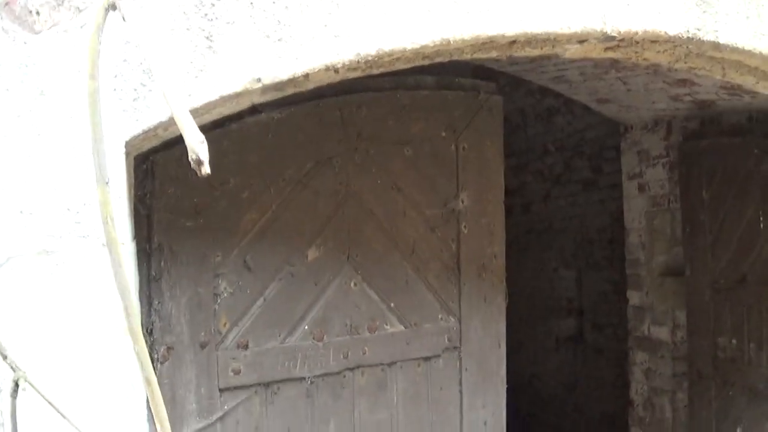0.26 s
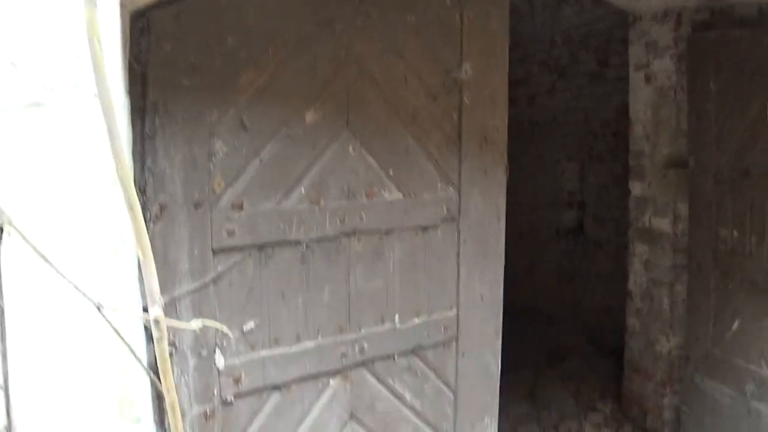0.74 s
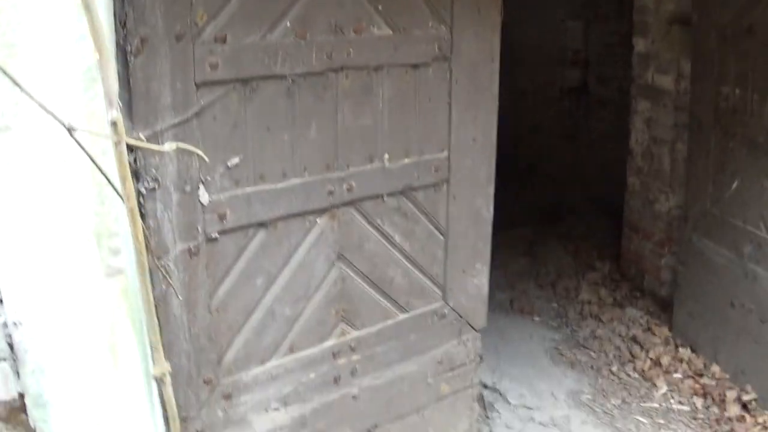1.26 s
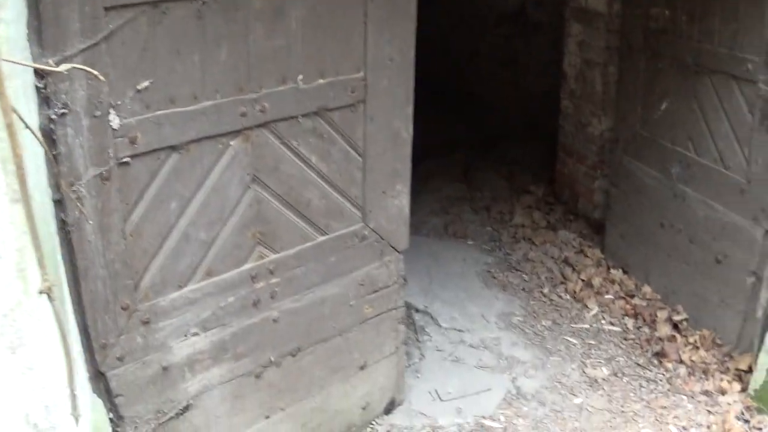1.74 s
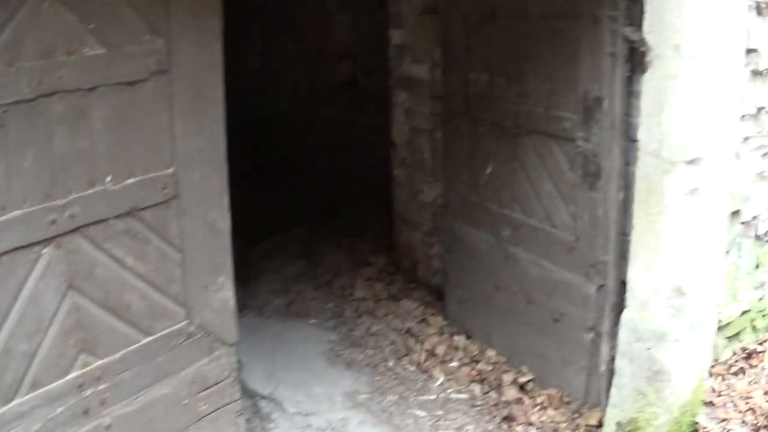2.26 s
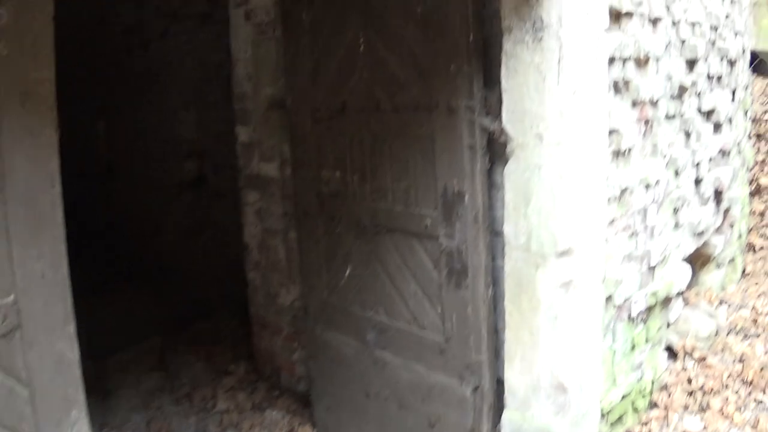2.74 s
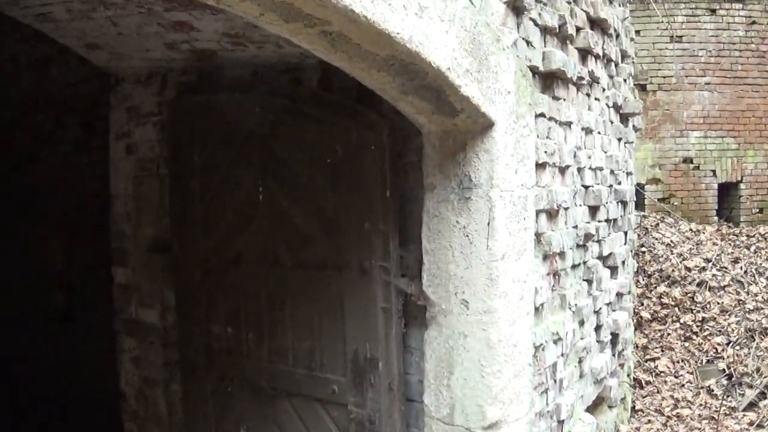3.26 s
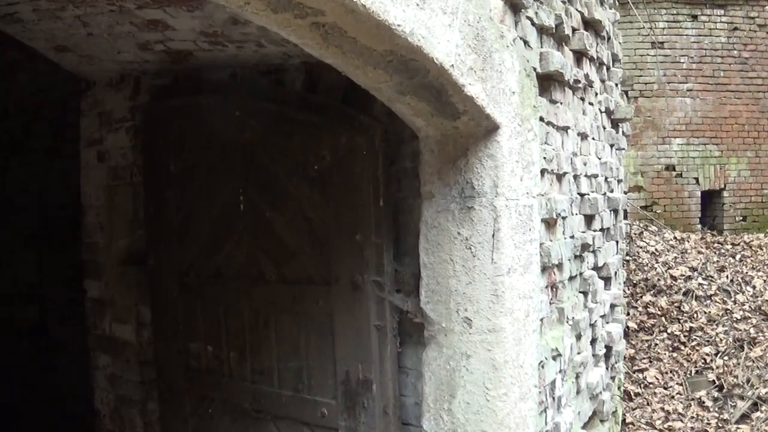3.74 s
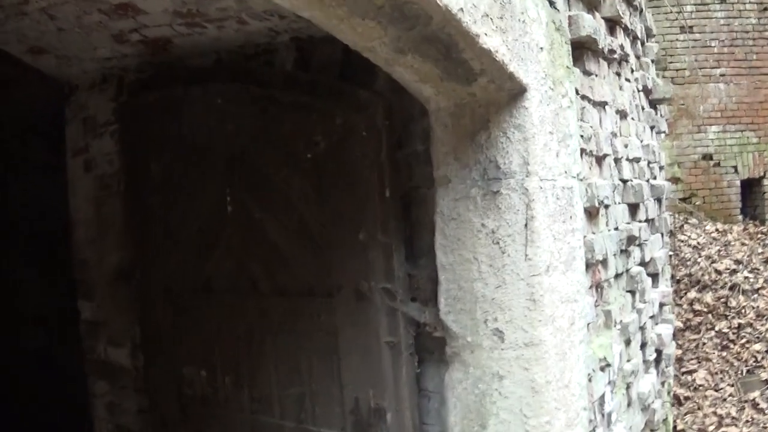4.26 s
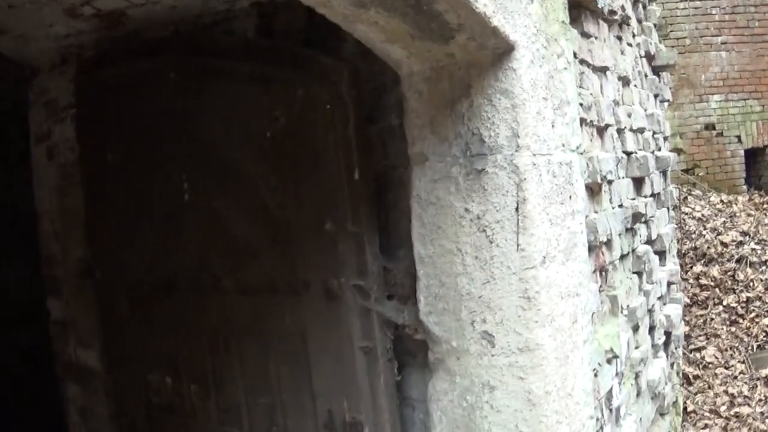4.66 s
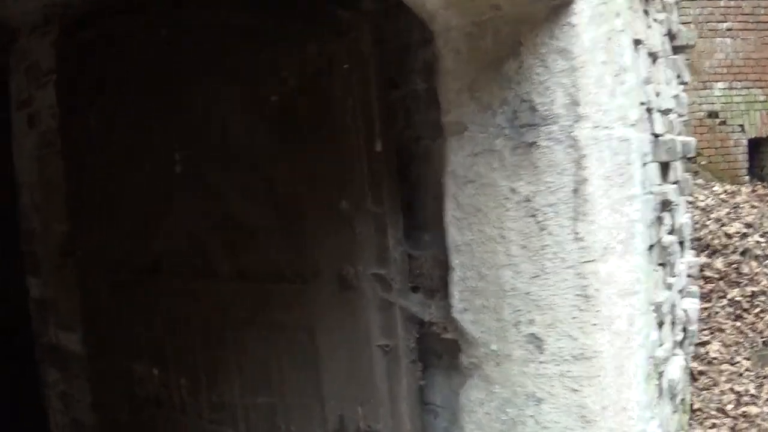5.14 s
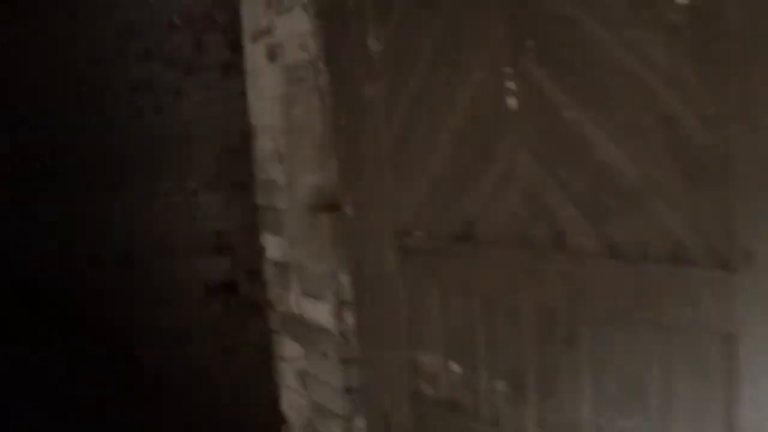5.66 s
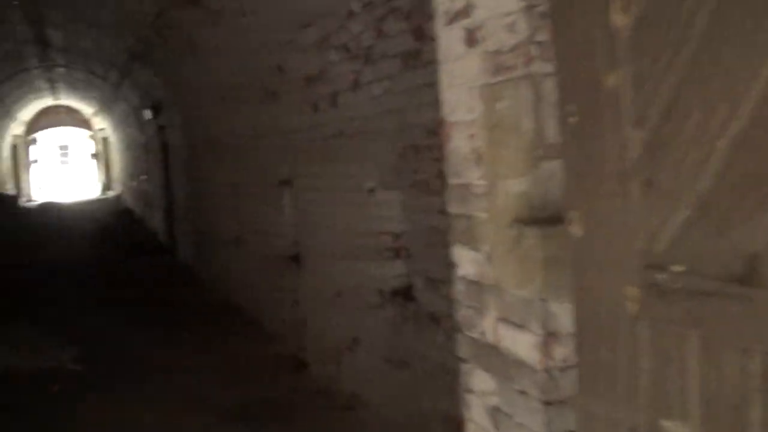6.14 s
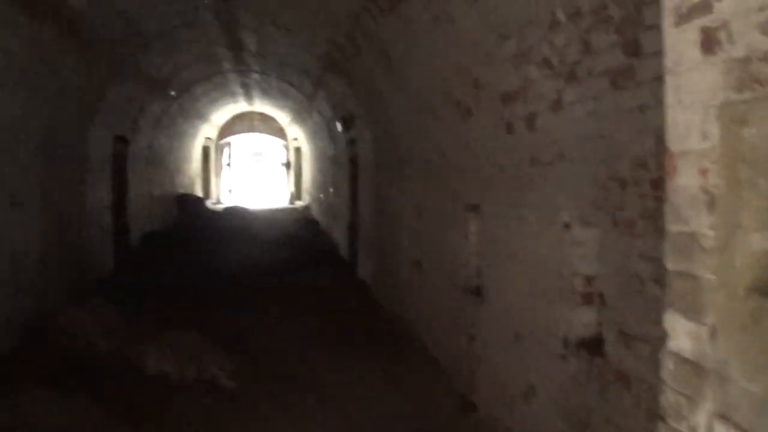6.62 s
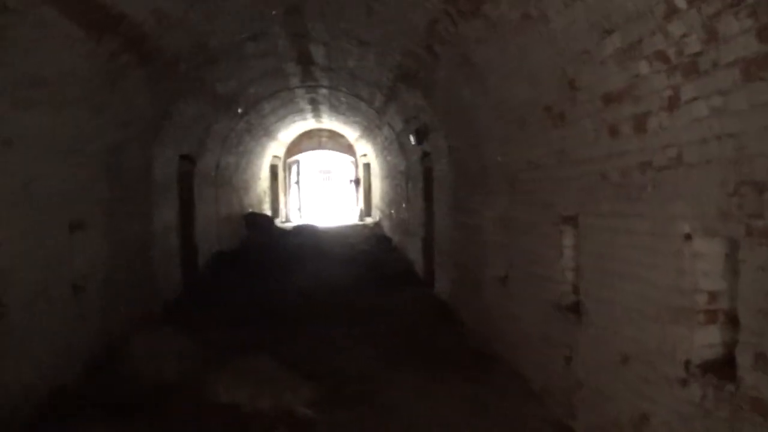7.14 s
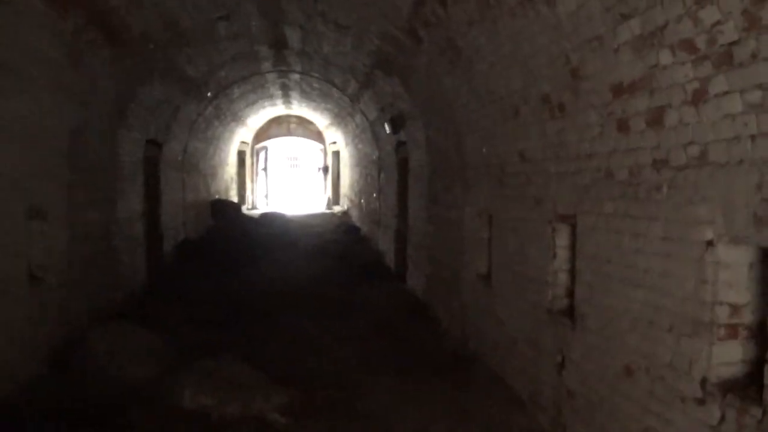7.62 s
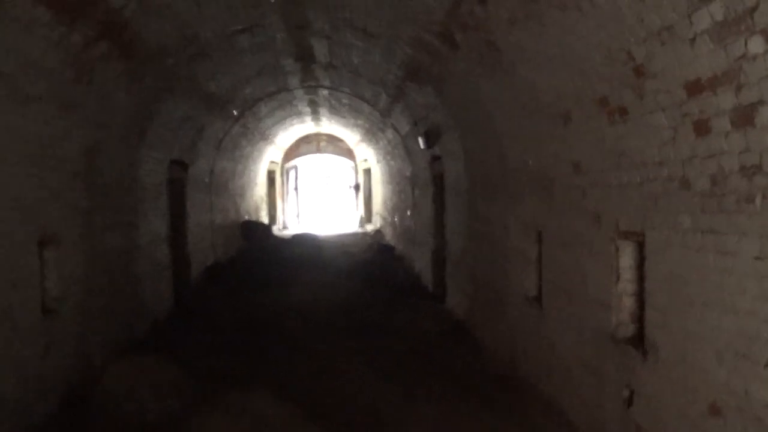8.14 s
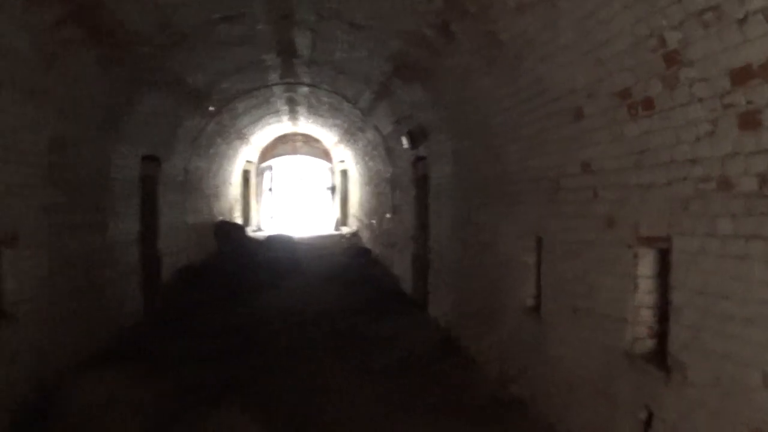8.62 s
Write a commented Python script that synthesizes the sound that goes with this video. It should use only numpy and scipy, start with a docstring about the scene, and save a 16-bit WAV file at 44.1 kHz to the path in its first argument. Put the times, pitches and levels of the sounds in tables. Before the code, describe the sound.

Close by, brittle fallen leaves are pressed and swept underfoot, cracking sharply in uneven bursts, with twigs snapping and low footfalls beneath. Before this there are only faint bird chirps, tiny regular ticks and outdoor hush. Towards the end the leaves give way to sparse, softer, duller gritty steps in the tunnel mouth. Faint brick reverberation, distant rumble and microphone hiss throughout.

```python
"""Dry leaves crackle and crush as someone shuffles at the door of a brick tunnel, then treads on grit.
Bursts of damped cosines make the leaves; decaying noise makes the clicks of snapping leaves and twigs.
Damped modes with filtered noise make the footfalls; sparse random taps make the wall echoes.
Swept sines make a few birds, a damped sine faint ticking, a wandering sine the hum;
filtered noise makes far traffic, outdoor wash and hiss."""
import sys
import numpy as np
from scipy import signal
from scipy.io import wavfile
from scipy.ndimage import uniform_filter1d

SR = 44100
rng = np.random.default_rng(int(sys.argv[2]) if len(sys.argv) > 2 else 0)


def materialize(psi):
    """Save the field psi as 16-bit PCM at rate SR to the path in sys.argv[1].

    A 1-D psi becomes a single channel; in a 2-D psi each row is a channel.
    """
    bounded = np.clip(np.atleast_2d(psi).T, -1, 1)
    quanta = np.round(bounded * 32767).astype(np.int16)
    wavfile.write(sys.argv[1], SR, quanta)


N = 392049

# Shoe sweeping or pressing leaves: full_s, rise_s (per SWING_DB), hold_s, fall_s (per SWING_DB),
# crackle_db, crush_db (re crackle)
SWEEPS = [(1.868, 0.098, 0.032, 0.17, -41.5, -12.5), (2.482, 0.037, 0.14, 0.22, -43.5, -7),
          (2.646, 0.095, 0.027, 0.11, -32, -7.5), (2.742, 0.082, 0.0046, 0.05, -27.5, -24),
          (3.153, 0.052, .005, 0.099, -39, -21), (3.223, 0.03, 0.0038, 0.093, -37, -10),
          (3.411, 0.33, .005, 0.084, -47.5, -5), (3.474, 0.0084, 0.016, 0.056, -46, 3.5),
          (3.635, 0.27, 0.0065, 0.21, -44.5, -12), (3.742, 0.16, 0.0074, .24, -44, -8),
          (3.946, 0.14, 0.041, 0.19, -35.5, -10.5), (4.096, 0.1, 0.0067, 0.16, -25, -10),
          (4.261, 0.041, 0.0032, 0.11, -28.5, -8), (4.393, 0.17, 0.059, 0.097, -35, -4.5),
          (4.588, 0.063, 0.0055, .3, -43, 0.5), (4.683, 0.081, 0.23, 0.39, -25, -9),
          (5.1, 0.1, 0.0079, 0.045, -29.5, -15), (5.2, 0.11, .005, 0.13, -33, -7.5),
          (5.387, 0.0088, .03, 0.028, -29.5, -8), (5.41, 0.018, 0.035, 0.052, -21.5, -18),
          (5.469, .02, 0.012, 0.042, -26.5, -8), (6.051, 0.068, 0.0044, 0.13, -48.5, -13),
          (6.647, 0.17, 0.0054, 0.055, -36.5, -13), (7.05, .01, 0.013, .03, -58, 11.5),
          (7.11, 0.033, 0.023, 0.16, -45, 2.5), (7.272, 0.022, 0.011, .04, -51, -15),
          (7.336, 0.072, 0.074, 0.12, -70, 14), (7.524, 0.0066, 0.0059, 0.035, -52.5, -15),
          (7.853, .02, 0.023, 0.195, -57.5, -2), (7.967, 0.009, 0.014, .15, -60.5, 0.5),
          (8.233, 0.0073, 0.023, 0.031, -58.5, -8), (8.546, 0.1, 0.0037, 0.17, -59.5, -6),
          (8.607, .006, 0.011, 0.15, -56.5, 6), (8.689, 0.011, 0.034, 0.039, -65, 14)]
# Stirred leaves settling between sweeps: time_s, crackle_db, crush_db (re crackle), left_right_db
RUSTLE = [(.7, -75, -7, 0), (.91, -63.5, -16, .1), (1.1, -65.5, -11, .1), (1.75, -53, -6, 0),
          (2.42, -59.5, -7, .1), (2.79, -47.5, -14, -0.2), (2.87, -42, -10, -0.5), (3.09, -40, -14, .4),
          (3.33, -54, 1, -.3), (4.45, -47.5, -12, 0.5), (4.7, -47.5, 11.5, -1.4), (5.25, -50, 3, -1.3),
          (5.5, -35, -7, 1), (5.74, -37.5, -3, 1.6), (6.15, -50.5, -6.5, 1), (6.36, -45, -4.5, -1.5),
          (6.56, -47.5, -4, -2), (6.87, -57.5, -1, -2.5), (7.75, -69, -5.5, 0), (8.89, -67.5, 1, -.3)]
# Spectrum shape of leaf sound: frequency_hz, density_db (per Hz, relative)
LEAF_SPECTRUM = [(88, -54.5), (150, 7), (249, 0.5), (448, 1), (494, -2), (601, 1.5), (2140, 1.5), (7770, 1),
                 (9440, 4), (15100, -19), (16000, -11)]
# Stereo width of the leaves: frequency_hz, side_db (re mid)
LEAF_WIDTH = [(60, -26), (240, -21.5), (600, -13), (1900, -10), (5000, -8.5), (8500, -10), (11000, -16.5),
              (15000, -37)]
# Breaking leaves and twigs: start_s (before a fixed 1.27 ms delay), level_db (before a 3 dB cut),
# pitch_hz, dull_db (early rms re the peak of the sharp part)
SNAPS = [(1.36, -35, 8130, -24), (1.5539, -38, 8720, -23), (1.5985, -26.5, 9300, -19.5),
         (1.6846, -30, 9100, -22), (1.708, -25, 9050, -26), (2.1503, -19.5, 8800, -20),
         (2.2194, -30, 9100, -28), (2.294, -33.5, 8630, -33), (2.3296, -29.5, 9800, -27),
         (2.5147, -27, 9340, -17), (2.5989, -22.5, 8860, -7.5), (2.6312, -18.5, 9610, -12.5),
         (2.7607, -11, 7900, -12.5), (2.8574, -26, 8710, -13), (2.878, -19, 8040, -32),
         (2.8912, -17.5, 4050, -34), (2.9287, -19, 8600, -25), (2.9768, -24.5, 8870, -12),
         (3.035, -17, 9080, -16.5), (3.1218, -17.5, 8520, -19.5), (3.1353, -14, 3870, -22),
         (3.1553, -16, 8200, -13.5), (3.2046, -13, 11200, -29), (3.2236, -15.5, 3730, -20),
         (3.4665, -28, 2840, -9.5), (3.5245, -21, 8650, -31), (3.54, -18.5, 8780, -40),
         (3.562, -18, 9400, -32), (3.5813, -23, 8500, -25), (3.5922, -19, 9560, -33),
         (3.631, -16, 6450, -15), (3.6593, -24, 5150, -15), (3.692, -22, 8600, -13.5),
         (3.7338, -22, 9470, -14.5), (3.7522, -20, 7730, -33), (3.7948, -22.5, 8300, -18),
         (3.8736, -24.5, 8200, -18), (4.0594, -13, 8070, -19), (4.0896, -16, 9700, -18),
         (4.2568, -3.5, 4930, -15), (4.2941, -19.5, 9200, -5.5), (4.3778, -20, 8340, -23),
         (4.5514, -18.5, 9660, -24), (4.5825, -11.5, 10800, -21), (5.2126, -16, 3510, -18),
         (5.3808, -27, 8500, -4.5), (5.3968, -17, 7120, -16), (5.4211, -11, 6760, -12),
         (5.7129, -18, 4550, -18), (5.7884, -20, 8510, -27), (5.902, -25, 3260, -21),
         (6.053, -21.5, 5560, -21), (6.2994, -18, 9100, -17), (6.3668, -11.5, 7420, -30),
         (6.4577, -19, 7050, -23), (6.4901, -16.5, 9640, -32), (6.5216, -15.5, 4070, -15),
         (6.7131, -27, 2760, -12.5), (7.0527, -30, 8970, -16), (7.1064, -27, 7890, -13),
         (7.133, -23, 4250, -9.5), (7.5217, -31, 7260, -33), (8.2324, -41.5, 3500, -5.5),
         (8.543, -33, 7700, -30), (8.6843, -46, 3290, -3)]
# Microphone response to close clicks: frequency_hz, gain_db
CLICK_RESPONSE = [(200, 9.5), (6000, 2), (9500, 4), (11500, 1.5), (16000, -24)]
# Heel and sole on the ground: start_s, peak_db, low_hz (leaves cushion the bass below),
# high_hz (the sole dulls above), ring_factor (times the decay time)
FOOTFALLS = [(2.15, -45, 170, 443, 1), (4.259, -20.5, 306, 580, 0.22), (4.546, -29, 180, 534, 0.89),
             (4.604, -22.5, 224, 635, 0.29), (5.575, -29, 94, 383, 0.68), (5.689, -40, 250, 654, 0.66),
             (6.522, -12.5, 323, 1150, 0.78), (6.53, -24, 89, 253, 0.4), (7.087, -26, 75, 520, 0.55),
             (7.178, -33, 80, 335, 0.24), (7.866, -29.5, 129, 624, .85), (7.973, -37, 113, 430, 0.45),
             (8.608, -34.5, 90, 620, 0.67), (8.70, -45, 90, 420, 0.65)]
# Modes of tunnel floor and air column, before scatter: frequency_hz, level_db (relative),
# t60_s (before ring_factor)
FLOOR_MODES = [(118.5, 1, 0.42), (150.4, -2, 0.51), (180, -6.5, 0.038), (222.6, 4.5, 0.15),
               (294.3, 3.5, 0.12), (374.5, 1.5, 0.123), (421.5, 2.5, 0.081), (520, -4, 0.2), (620, 2, 0.28),
               (669, -3, 0.11), (907, 1, 0.19), (1210, 14.5, 0.072)]
# Reverberation of the brick walls: frequency_hz, t60_s
WALL_DECAY = [(200, 1), (1000, 0.35), (4000, 0.022), (12000, 0.5)]
# Bird notes: start_s, length_s, start_hz, end_hz, level_db (before flutter and the gains in scene)
BIRDS = [(0.015, 0.043, 3800, 3770, -67), (0.122, 0.048, 6030, 5740, -69), (0.161, 0.058, 5700, 5630, -68),
         (0.206, 0.064, 3380, 3260, -84), (0.27, 0.046, 4540, 4800, -65), (0.39, 0.037, 3900, 3850, -91),
         (0.447, 0.095, 5700, 5450, -67), (0.808, .08, 3700, 3890, -69), (.915, 0.033, 3800, 3840, -67)]
# Hum: time_s, level_db (rms before swell), pitch_hz (before drift)
HUM = [(0, -72, 443.4), (2.2, -67.5, 441), (4, -86, 429.5), (8.89, -87, 433)]
# Far traffic: time_s, level_db (rms)
TRAFFIC = [(0.0, -61.5), (2.13, -59), (2.84, -67), (4.41, -55.5), (6.14, -58.5), (6.64, -53.5), (8.89, -75)]
# Spectrum shape of outdoor wash and hiss: frequency_hz, density_db (per Hz, relative)
AIR_SPECTRUM = [(12, -37), (20, 15.5), (53, -2.5), (120, -15.5), (301, -16), (388, -22.5), (434, -18.5),
                (542, -22), (1090, -26), (4670, -37.5), (5080, -38.5), (5680, -39.5), (6540, -38),
                (16000, -44.5)]
# Stereo width of the wash: frequency_hz, side_db (re mid)
AIR_WIDTH = [(60, -24), (150, -20), (380, -9.5), (950, -3.5), (2380, -2.5), (5980, -5), (15000, -26)]

SWING_DB = 20  # gained in one rise, lost in one fall
CRACKLE_SPREAD_DB, TICK_SPREAD_DB = 1.8, 3.2  # scale of the random strengths
TUNNEL_S, GRIT_HZ, GRIT_DB = 6.9, 2420, 0.7  # from here grit crushes duller than dry leaves
TICKS_PER_MS, TICK_DB, SWEEP_TICK_DB = .25, -12, -12.5  # levels re the rustle and re the crackle
SPLINTER_DB = -20.5  # re the click, at their start
PIP_START_S, PIP_END_S, PIPS_PER_S = .0093, 2.4, 25
PIP_DB, PIP_HZ, PIP_T60_S, PIP_WEAK_DB = -60, 2620, .025, -4  # every second pip is weaker
HUM_DRIFT_HZ, HUM_SWELL = 5, .5  # rms wander of pitch; approximate rms swell as a share of amplitude
AIR_DB = -58  # rms of the mid signal
EDGE_HZ = 15950


def gain_of(db):
    """Level definition: 20 dB is a factor of ten in amplitude."""
    return 10 ** (np.asarray(db) / 20)


def evened(x):
    """Normalisation: all rows are divided by the rms of the first."""
    return x / np.sqrt(np.mean(x[0] ** 2) + 1e-20)


def read(points, hz):
    """Logarithmic pitch scale: a curve is interpolated along log frequency."""
    f, value = np.transpose(points)
    return np.interp(np.log(hz + 1), np.log(f + 1), value)


def along(rows):
    """Linear interpolation: each column becomes a curve over the whole time."""
    s, *columns = np.transpose(rows)
    return [np.interp(np.arange(N) / SR, s, column) for column in columns]


def add(mix, s, sound):
    """Superposition: a sound is summed into the mix at its start, cut at the end."""
    part = mix[..., round(s * SR):][..., :sound.shape[-1]]
    part += sound[..., :part.shape[-1]]


def colour(x, points, size=2048):
    """Minimum phase: the Hilbert transform of log gain gives a causal filter that follows a spectrum."""
    db = np.maximum(read(points, abs(np.fft.fftfreq(size, 1 / SR))), -100)
    log_gain = np.log(gain_of(db))
    taps = np.fft.ifft(np.exp(np.conj(signal.hilbert(log_gain)))).real[:size // 2]
    taps = taps.reshape((1,) * (x.ndim - 1) + (-1,))
    return signal.oaconvolve(x, taps, axes=-1)[..., :x.shape[-1]]


def band(x, lo_hz, hi_hz):
    """Band-pass filtering: a Butterworth filter keeps what lies between two edges."""
    return signal.sosfilt(signal.butter(2, (lo_hz, hi_hz), "band", fs=SR, output="sos"), x)


def ports(mid_side, width):
    """Spaced reception: two close microphone ports hear a difference that depends on frequency."""
    side = colour(mid_side[1], width)
    return np.array([mid_side[0] + side, mid_side[0] - side])


def grains(per_ms, spread_db, lo_hz, hi_hz, cycles, count):
    """Shot noise: damped bursts of several pitches at random moments, in mid and side, at steady power."""
    chance = per_ms * 1000 / SR
    strength = gain_of(spread_db * np.minimum(rng.exponential(1, N), 5))
    size = strength * (rng.random(N) < chance) / np.sqrt(chance)
    kind = rng.integers(0, count, N)
    side = rng.choice([-1., 1.], N)
    out = np.zeros((2, N))
    for k, hz in enumerate(np.geomspace(lo_hz, hi_hz, count)):
        turns = np.arange(round(4 * cycles * SR / hz)) * hz / SR
        burst = hz * np.exp(-turns / cycles) * np.cos(2 * np.pi * turns)
        hits = size * (kind == k)
        out += signal.oaconvolve([hits, hits * side], burst[None], axes=1)[:, :N]
    return out


def sweeping():
    """Power addition: every sweep rises, holds and falls over the rustle; returns crackle and crush dB."""
    t = np.arange(N) / SR
    rustle_db, dull_db, _ = along(RUSTLE)
    crackle, crush = gain_of(2 * rustle_db), gain_of(2 * (rustle_db + dull_db))  # powers
    for s, rise, hold, fall, db, crush_db in SWEEPS:
        away = np.maximum((s - t) / rise, 0) + np.maximum((t - s - hold) / fall, 0)
        power = gain_of(2 * (db - SWING_DB * np.minimum(away, 10)))
        crackle = crackle + power
        crush = crush + power * gain_of(2 * crush_db)
    return 10 * np.log10(crackle), 10 * np.log10(crush / crackle)  # crush re crackle


def leaves():
    """Brittle fracture: edges crackle, whole leaves crush duller, and a harder sweep breaks more of them."""
    crackle_db, crush_db = sweeping()
    clumps = evened(band(rng.standard_normal((2, N)), 3.34, 28.6))  # leaves give way in small heaps
    per_ms = 6.0 * gain_of(.45 * (crackle_db + 42.0))
    edges = grains(per_ms, CRACKLE_SPREAD_DB, 1650, 16700, cycles=0.4, count=8)
    crackle = evened(band(colour(edges, LEAF_SPECTRUM), 1370, 20400))
    whole = grains(1.2 + .4 * per_ms, 1.8, 226, 3800, cycles=0.93, count=8)
    crush = evened(band(colour(whole, LEAF_SPECTRUM), 217, 2470))
    grit = gain_of(GRIT_DB) * band(crush, 280, GRIT_HZ)
    crush = np.where(np.arange(N) < TUNNEL_S * SR, crush, grit)
    crackle *= gain_of(1.34 * clumps[0])
    crush *= gain_of(crush_db + 1.36 * clumps[0] + 0.8 * clumps[1])
    return gain_of(crackle_db) * (crackle + crush)


def ticks():
    """Sparse impulses: small leaf edges snap one by one, following both rustle and sweeps."""
    sparse = grains(TICKS_PER_MS, TICK_SPREAD_DB, 2420, 14500, cycles=2.3, count=12)
    sparse = evened(band(colour(sparse, LEAF_SPECTRUM), 1100, 11300))
    settling = gain_of(along(RUSTLE)[0] + TICK_DB)
    swept = gain_of(sweeping()[0] + SWEEP_TICK_DB)
    return (settling + swept) * sparse


def snaps():
    """Impulsive fracture: a sharp click, then splinters that die away; thick twigs add a dull part."""
    out, t = np.zeros((2, N)), np.arange(2500) / SR
    for s, db, hz, dull_db in SNAPS:
        noise = rng.standard_normal((2, 2, len(t)))
        click = noise[0] * gain_of(-60 * t / 0.012)
        click[:, 0] += [2.5, 1.2 * noise[1, 1, 0]]  # the break starts with one hard edge
        splinters = noise[1] * gain_of(SPLINTER_DB - 60 * t / 0.086)
        crack = click + splinters
        sharp = band(crack, 3100, 12400) + 1.2 * band(crack, 0.75 * hz, 1.18 * hz)
        sharp = colour(sharp, CLICK_RESPONSE, size=256)
        dull = band(click + 2.3 * splinters, 500, 3370)
        sound = sharp / abs(sharp[0]).max() + gain_of(dull_db) * dull / dull[0, :300].std()
        # each click starts 1.27 ms after its listed time
        add(out, s + 0.00127, gain_of(db) * sound / np.sqrt(2))
    return out


def footfalls():
    """Modal excitation: a heel rings the floor's modes; grit under the sole roughens the ring."""
    out, t = np.zeros(N), np.arange(16000) / SR
    for s, db, lo_hz, hi_hz, factor in FOOTFALLS:
        age = t / factor
        ring = np.zeros(len(t))
        for hz, mode_db, t60 in FLOOR_MODES:
            a, b = rng.standard_normal(2)  # each step scatters level and pitch
            decay = gain_of(mode_db + 0.99 * a - 60 * age / t60)
            ring += decay * np.sin(2 * np.pi * hz * (1 + 0.021 * b) * t)
        grit = band(rng.standard_normal(len(t)), 126, 1080)
        blow = ring / abs(ring).max() + 0.29 * grit / grit.std() * gain_of(-60 * age / 0.24)
        blow *= np.minimum(t / 0.00095, 1)  # soft onset
        blow = band(band(blow, lo_hz, hi_hz), 0.26 * lo_hz, 0.76 * hi_hz)
        add(out, s, gain_of(db) * blow / abs(blow).max())
    return out


def walls(x):
    """Reverberation: brick walls send back sparse echoes whose decay time depends on frequency."""
    taps = np.zeros((2, SR // 2))
    slots = np.arange(200, SR // 2 - 20, 20)
    at = slots + rng.integers(0, 20, (2, len(slots)))
    np.put_along_axis(taps, at, rng.choice([-1., 1.], at.shape), 1)
    hz, t, z = signal.stft(taps, SR, nperseg=256)
    decay = gain_of(-60 * t / read(WALL_DECAY, hz)[:, None])
    tail = signal.istft(z * decay, SR, nperseg=256)[1]
    return signal.fftconvolve(x[None], tail / np.linalg.norm(tail[0]), axes=1)[:, :N]


def birds():
    """Amplitude modulation: short gliding whistles, smeared by distance into narrow flutters."""
    out = np.zeros(N)
    for s, length, start_hz, end_hz, db in BIRDS:
        hz = np.linspace(start_hz, end_hz, round(length * SR))
        slow = uniform_filter1d(rng.standard_normal((1, len(hz))), size=90)
        flutter = 0.65 + evened(slow)[0]
        whistle = np.sin(2 * np.pi * np.cumsum(hz) / SR) * np.hanning(len(hz)) ** .5
        add(out, s, gain_of(db) * flutter * whistle)
    return out


def pips():
    """Periodic excitation: evenly spaced impulses of varying strength ring one damped sine."""
    at = np.arange(PIP_START_S, PIP_END_S, 1 / PIPS_PER_S)
    train, t = np.zeros(N), np.arange(2000) / SR
    weak = np.arange(len(at)) % 2 == 0
    train[(at * SR).astype(int)] = gain_of(2.0 * rng.standard_normal(len(at)) + PIP_WEAK_DB * weak)
    ring = gain_of(PIP_DB - 60 * t / PIP_T60_S) * np.sin(2 * np.pi * PIP_HZ * t)
    return signal.oaconvolve(train, ring)[:N]


def hum():
    """Frequency and amplitude modulation: a thin tone drifts in pitch and swells a few times a second."""
    db, hz = along(HUM)
    drift, swell = evened(band(rng.standard_normal((2, N)), 1, 4.2))
    tone = np.sqrt(2) * np.sin(2 * np.pi * np.cumsum(hz + HUM_DRIFT_HZ * drift) / SR)
    return gain_of(db) * (1 + HUM_SWELL * swell) * tone


def traffic():
    """Narrow-band noise: far traffic is a lumpy rumble, alike in both channels."""
    low = band(band(rng.standard_normal((1, N)), 33.5, 71.0), 31, 160)
    return gain_of(along(TRAFFIC)[0]) * evened(low)[0]


def air():
    """Stationary noise: outdoor wash and microphone hiss share one steady spectrum."""
    noise = band(rng.standard_normal((2, N)), 98, .48 * SR)
    wash = gain_of(AIR_DB) * evened(colour(noise, AIR_SPECTRUM, size=4096))
    return ports(wash, AIR_WIDTH)


def scene():
    """Superposition: leaves and steps with their wall echoes, over birds, pips, hum, traffic and air."""
    crunch = leaves() + ticks() + snaps()
    steps = footfalls()
    song = birds()
    balance = np.tanh(along(RUSTLE)[2] * np.log(10) / 40)  # left-right dB to a share of mid
    lean = balance * crunch[0] * [[1], [-1]]
    echoes = walls(gain_of(-12.0) * crunch[0] + gain_of(-13.5) * steps)
    near = ports(crunch + echoes, LEAF_WIDTH) + lean + steps
    far_song = song * gain_of([[2.5], [.6]]) + gain_of(7.0) * walls(song)  # direct left, right; echoes
    return near + far_song + pips() + hum() + traffic() + air()


def record(dry):
    """Band limitation: a symmetric low-pass filter removes the treble above EDGE_HZ."""
    return signal.oaconvolve(dry, signal.firwin(511, EDGE_HZ, window=("kaiser", 9), fs=SR)[None], "same")


dry = scene()
out = record(dry)
materialize(out)
```